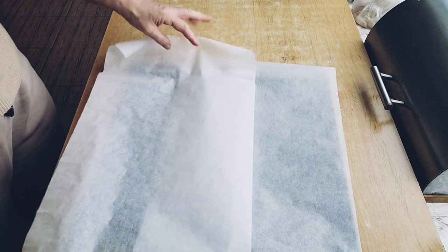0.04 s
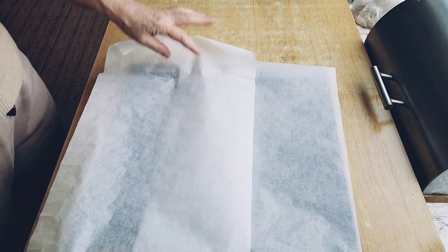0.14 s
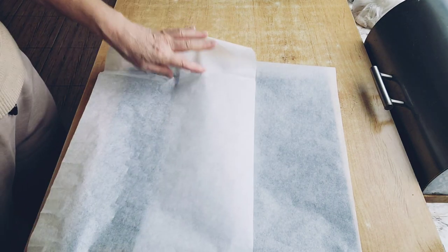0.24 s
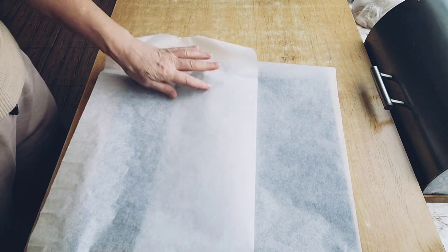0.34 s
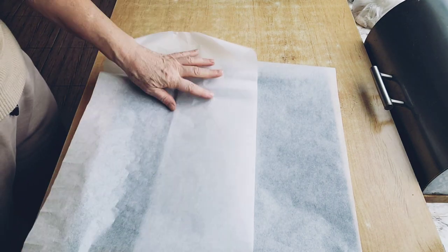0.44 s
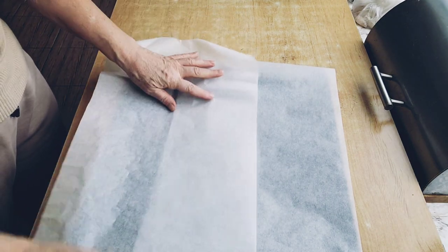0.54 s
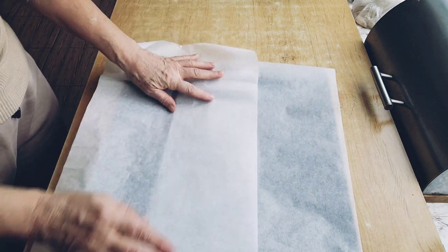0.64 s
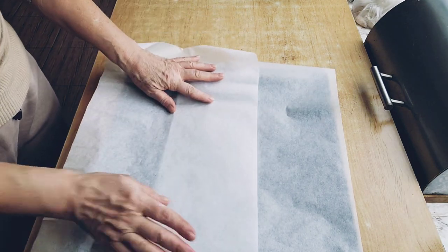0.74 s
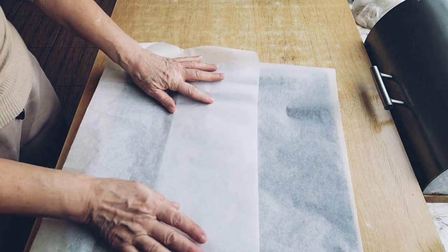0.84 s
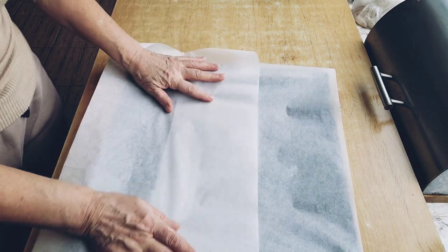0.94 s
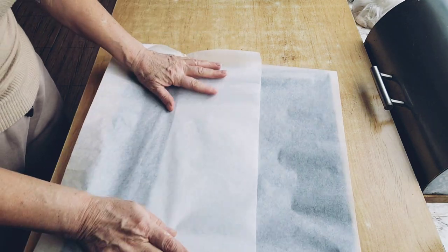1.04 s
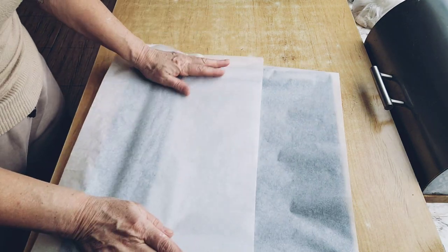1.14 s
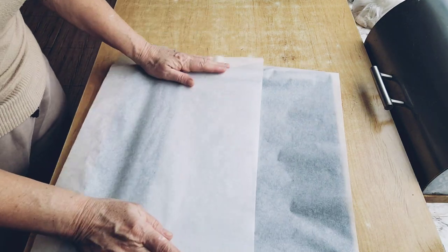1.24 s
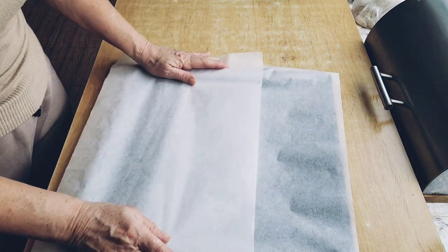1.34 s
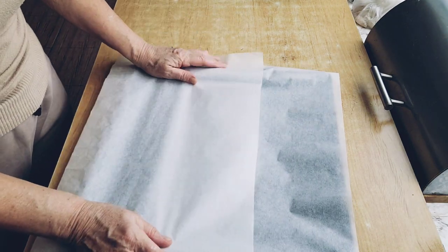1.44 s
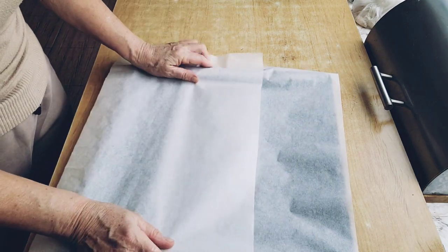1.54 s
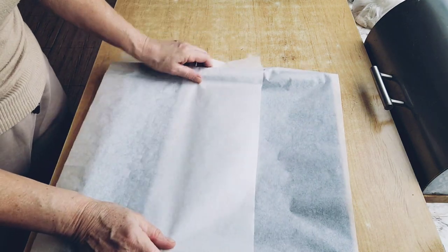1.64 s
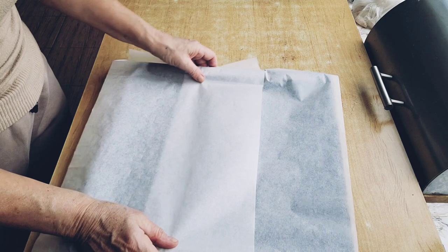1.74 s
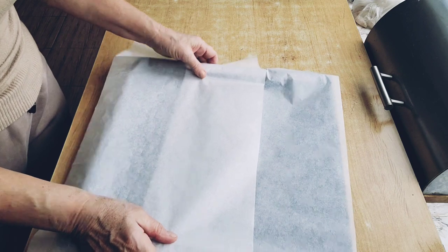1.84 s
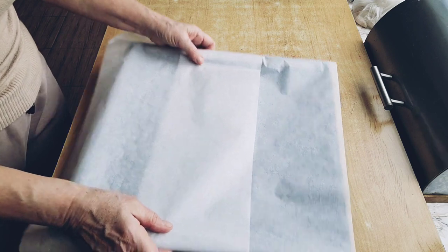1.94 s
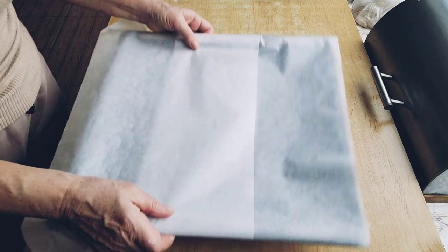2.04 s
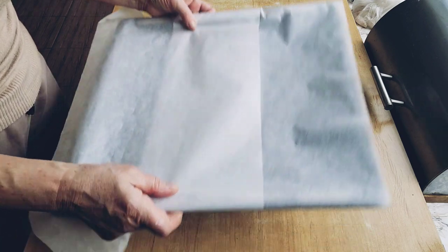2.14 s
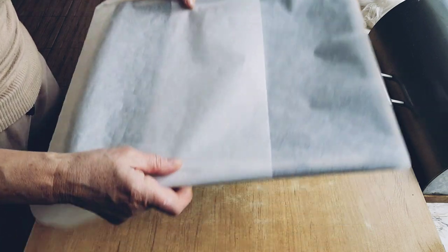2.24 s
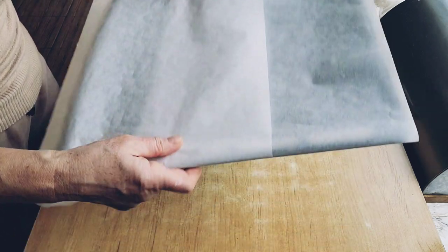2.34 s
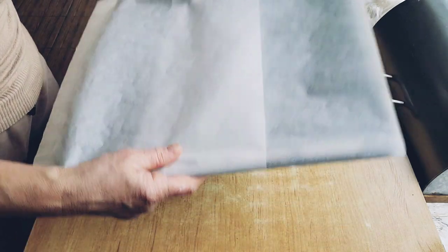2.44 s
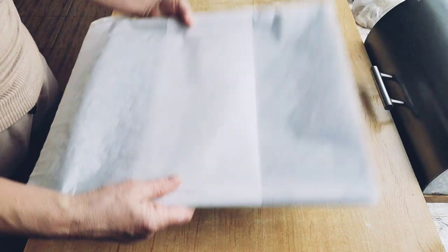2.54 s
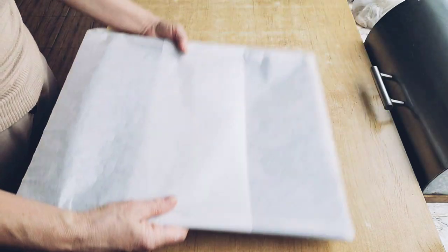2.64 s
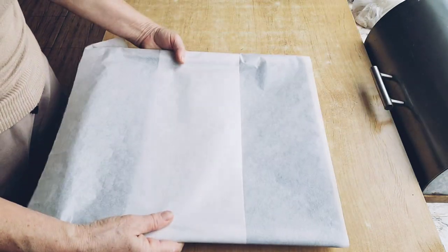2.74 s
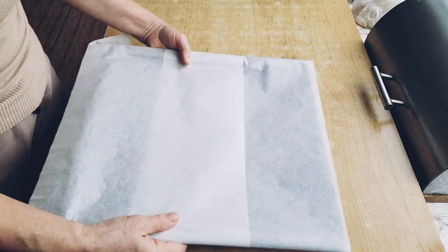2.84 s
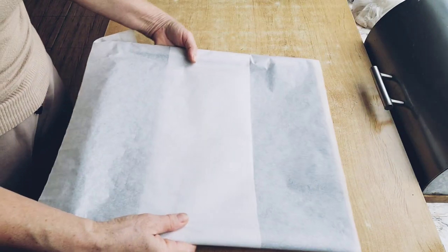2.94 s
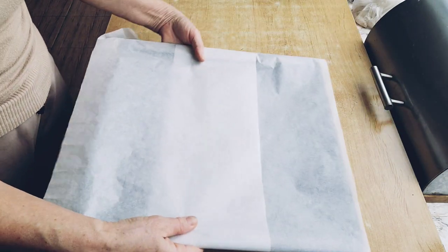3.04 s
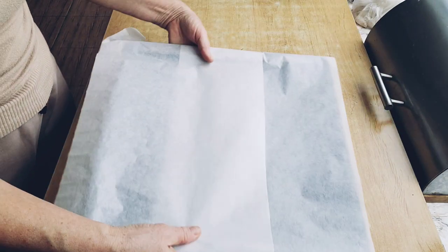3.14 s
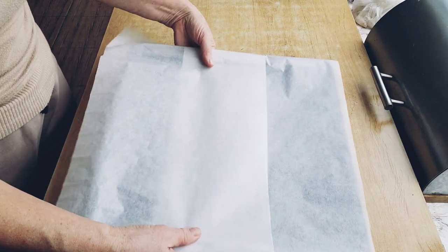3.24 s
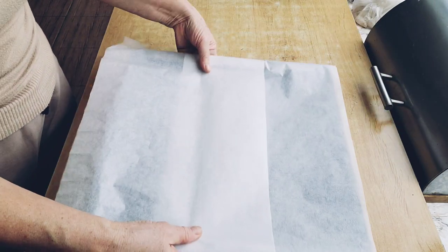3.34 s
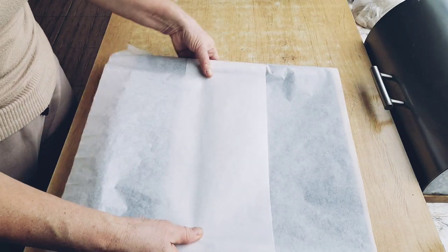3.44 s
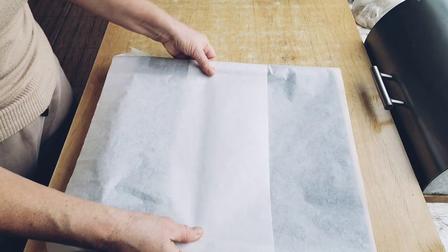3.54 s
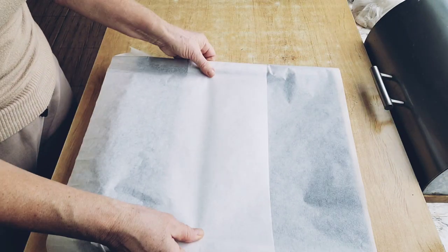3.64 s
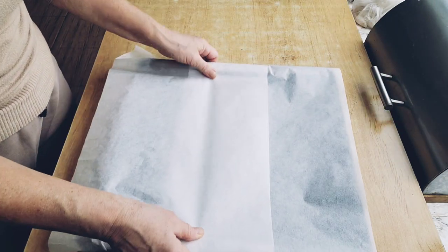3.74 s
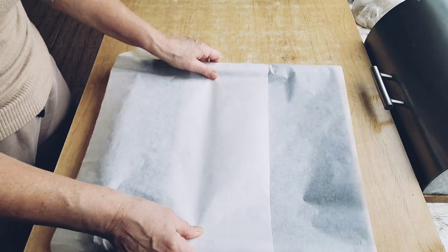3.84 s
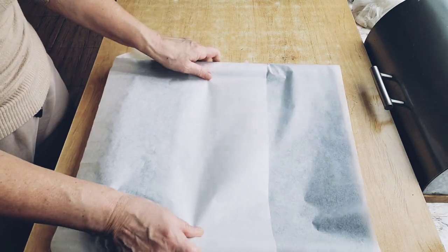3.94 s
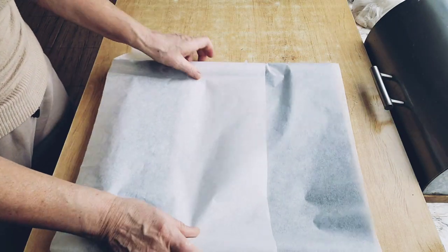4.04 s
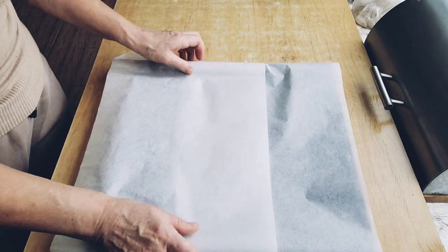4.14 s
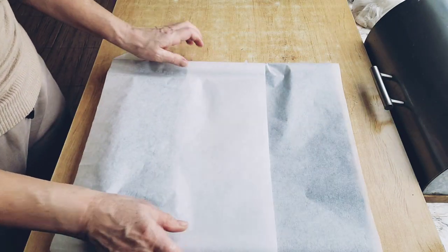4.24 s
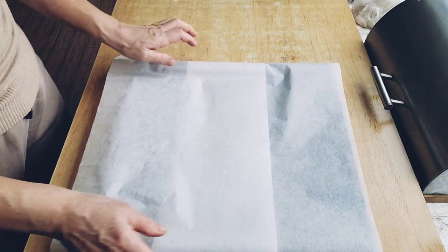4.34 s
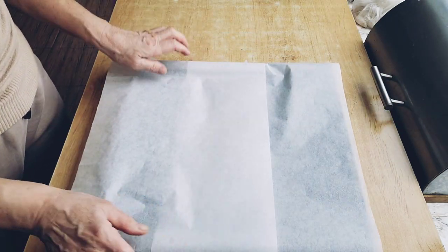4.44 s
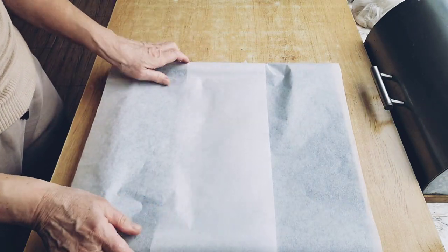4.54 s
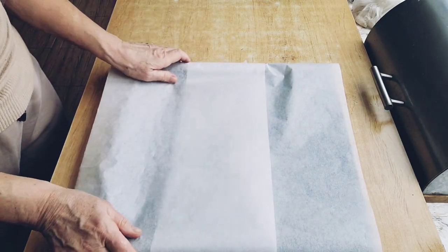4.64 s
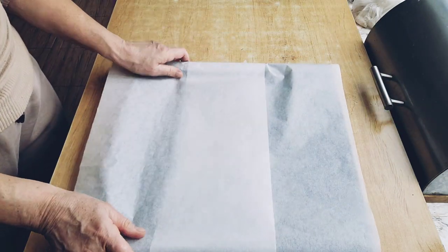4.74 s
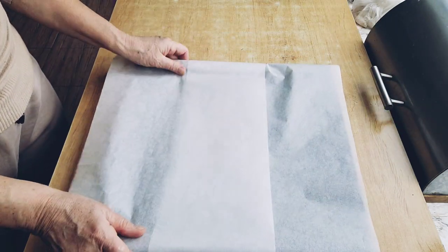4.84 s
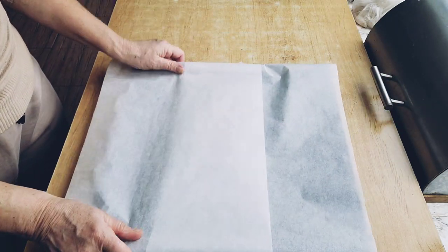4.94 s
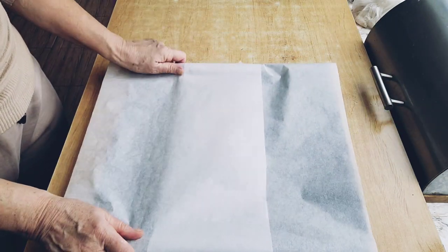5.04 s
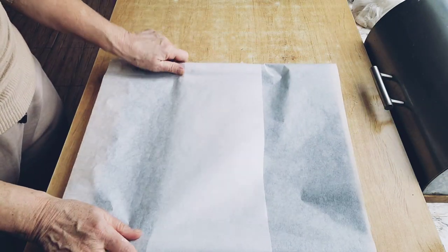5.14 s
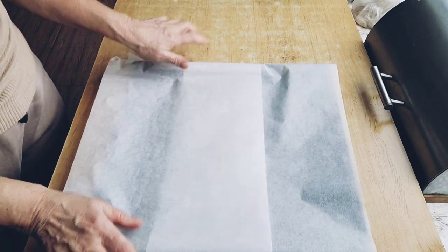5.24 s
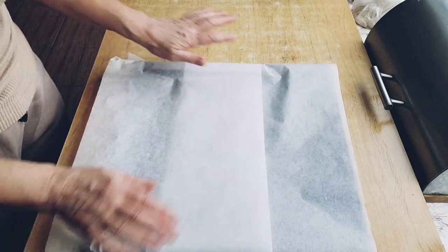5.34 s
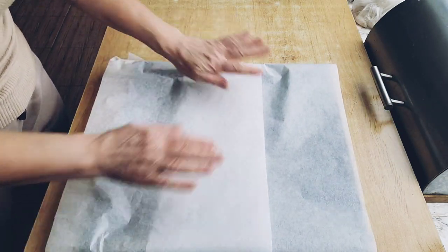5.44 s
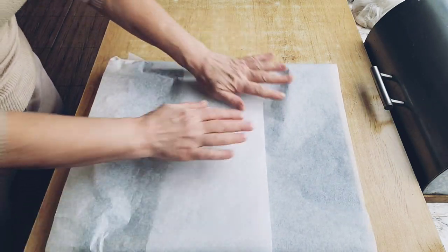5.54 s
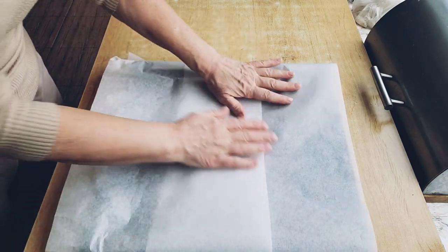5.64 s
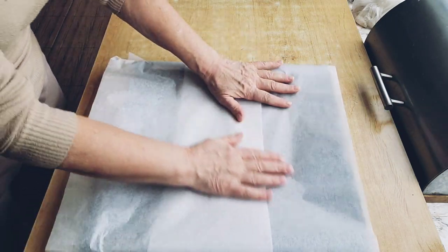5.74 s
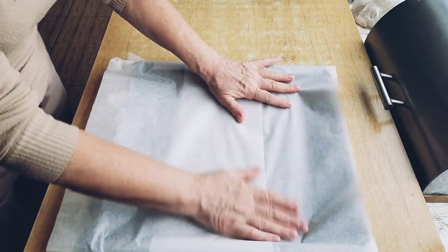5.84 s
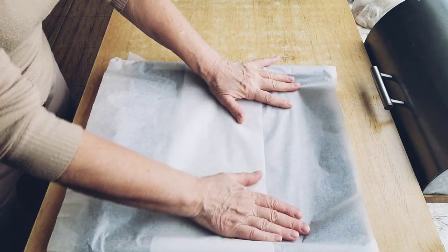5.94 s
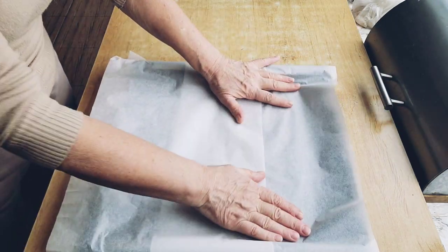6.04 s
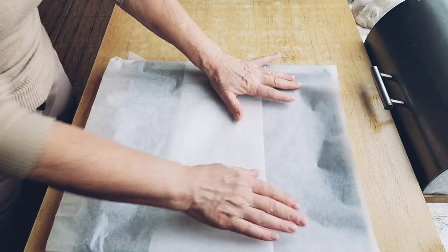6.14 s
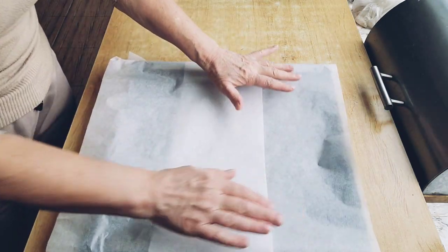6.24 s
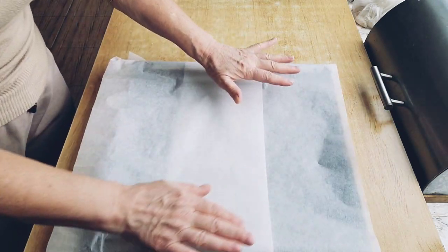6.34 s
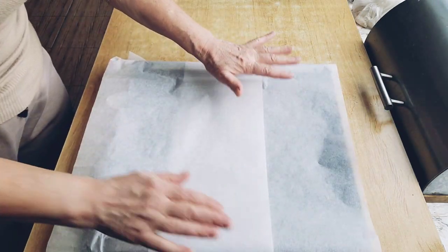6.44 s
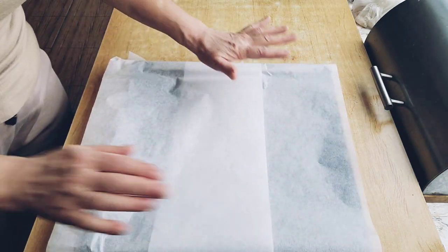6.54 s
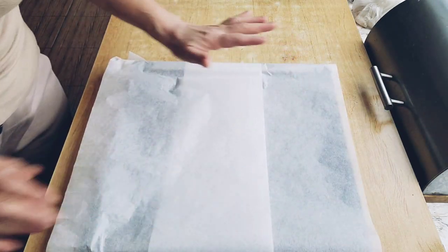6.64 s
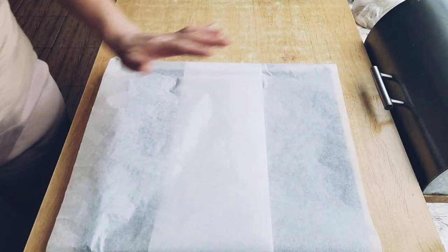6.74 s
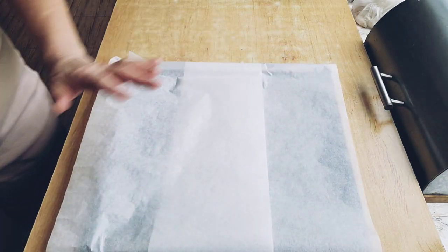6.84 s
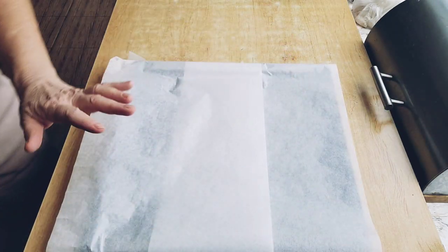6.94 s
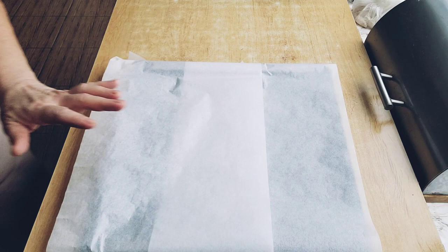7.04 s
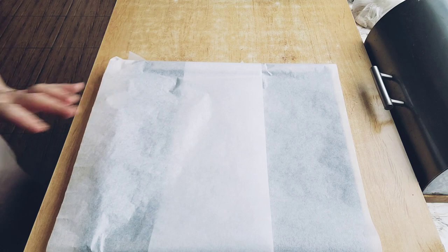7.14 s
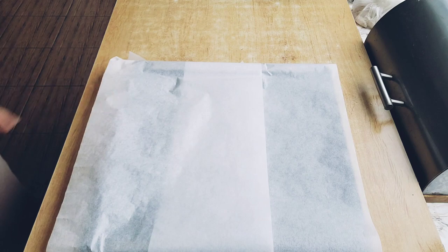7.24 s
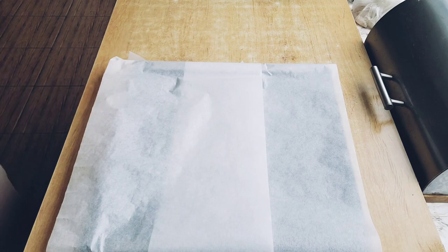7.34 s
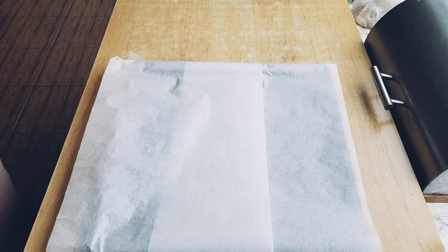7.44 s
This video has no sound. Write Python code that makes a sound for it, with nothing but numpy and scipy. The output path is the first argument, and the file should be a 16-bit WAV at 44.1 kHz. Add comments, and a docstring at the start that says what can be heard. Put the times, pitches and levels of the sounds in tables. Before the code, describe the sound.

Crisp parchment hisses and crinkles as it is stretched over a metal tray, with one sharp double knock midway on a wooden table.

```python
"""Baking parchment is smoothed by hand over a metal tray on a wooden table in a small kitchen.
The paper hisses as it slides and crackles as it buckles (noise and random shivers under hand strokes);
creases snap and the paper slaps at two knocks (short bursts); the loose sheet flexes hollowly (noise bands).
The tray knocks and rings (noise, thud, decaying modes); a sleeve brushes (coloured noise).
Behind it lie quiet air and a faint appliance hum."""
import sys
import numpy as np
from scipy import signal
from scipy.fft import rfft, irfft
from scipy.io import wavfile
from scipy.ndimage import uniform_filter1d

SR = 44100
rng = np.random.default_rng(int(sys.argv[2]) if len(sys.argv) > 2 else 0)


def master_out(mix):
    """Clip the mix to full scale and print it as 16-bit PCM to the path in sys.argv[1]."""
    frames = np.transpose(np.atleast_2d(mix))
    ceiling = np.clip(frames, -1, 1)
    pcm = np.round(ceiling * 32767).astype(np.int16)
    wavfile.write(sys.argv[1], SR, pcm)


N = 330309
TIME = np.arange(N) / SR


def from_db(db):
    """Decibels to amplitude gain."""
    return 10 ** (np.asarray(db) / 20)


def rms_one(x):
    """Scale to unit power."""
    return x / np.sqrt(np.mean(x ** 2) + 1e-20)


def at_hz(points, hz):
    """Read a table along log frequency."""
    known_hz, values = np.transpose(points)
    return np.interp(np.log(np.maximum(hz, 1)), np.log(known_hz), values)


def cut(x, hz, kind, order=2):
    """Butterworth filter."""
    sos = signal.butter(order, np.clip(hz, 10, SR * .45), kind, fs=SR, output="sos")
    return signal.sosfilt(sos, x + 1e-18)


def convolve(x, response):
    """Pass both channels through a response."""
    return signal.oaconvolve(np.atleast_2d(x), np.atleast_2d(response), axes=1)[:, :N]


def colour(x, spectrum, size=4096):
    """Causal (minimum-phase) filter of unit energy with the given spectrum."""
    gain = from_db(at_hz(spectrum, np.fft.rfftfreq(size, 1 / SR)))
    cepstrum = irfft(np.log(gain))
    # fold the cepstrum onto positive time
    causal = 2 * cepstrum[:size // 2] * (np.arange(size // 2) > 0)
    response = irfft(np.exp(rfft(causal, size)))
    return convolve(x, response / np.linalg.norm(response))


def diffuse(size, apart_hz=720):
    """Stereo noise: the two microphones hear the same bass but unrelated treble."""
    mid, side = rng.standard_normal((2, size))
    side = cut(side, apart_hz, "high", order=1)
    return rms_one(np.array([mid + side, mid - side]))


def placed(x, lag_samples, pan_db):
    """A point on the sheet reaches the two microphones at different times and levels."""
    left = x * from_db(pan_db / 2)
    right = np.roll(x, int(lag_samples)) * from_db(-pan_db / 2)
    return np.array([left, right])


def linger(power, t60_s):
    """Spread power into an exponential tail that holds the same energy."""
    r = from_db(-120 / (max(t60_s, .001) * SR))
    return signal.lfilter([1 - r], [1, -r], power + 1e-16)


def kitchen(x, wet_db, t60_s, early_db=-0.5, early_t60_s=0.17, dull_hz=None):
    """Echoes are a fresh scatter of noise under decaying power: quick ones off the table, then the room."""
    power = np.mean(x ** 2, axis=0)
    early, wet = from_db(early_db) ** 2, from_db(wet_db) ** 2
    room = linger(linger(power, .025), t60_s)
    echoes = early * linger(power, early_t60_s) + wet * room
    scatter = diffuse(N)
    if dull_hz:
        scatter = rms_one(cut(scatter, dull_hz, "low"))
    return (x + np.sqrt(echoes) * scatter) / np.sqrt(1 + early + wet)


def drift(knots_per_s):
    """Slow chance: random knots with a spread of 1, joined by straight lines."""
    knots = rng.standard_normal(512)
    return np.interp(TIME * knots_per_s, np.arange(len(knots)), knots)


def swell(crest_s, rise_s, fade_s, db):
    """Power of one movement: it gathers, crests and dies away."""
    shape = 1.68  # 10 dB down one rise before and one fade after the crest; 1 is pointed, 2 is round
    span_s = np.where(TIME < crest_s, max(rise_s, .005), max(fade_s, .005))
    away = np.abs(TIME - crest_s) / span_s
    return from_db(db - 10 * np.minimum(away ** shape, 20)) ** 2


def background():
    """Quiet air is coloured noise; an appliance hums in a few steady sines."""
    # Each row: frequency in Hz, RMS level in dB.
    hum_tones = [(49, -89.5), (102, -81.5), (300, -83.5)]
    # Spectrum of the still air. Each row: frequency in Hz, density in dB per Hz.
    air_spectrum = [(20, -8), (50, 2), (130, -12), (300, -13.5), (600, -14.5), (1500, -20), (5000, -29),
                    (16000, -32)]
    hum = sum(from_db(db) * np.sqrt(2) * np.sin(2 * np.pi * hz * TIME) for hz, db in hum_tones)
    return hum + from_db(-73.0) * colour(diffuse(N), air_spectrum)


def sleeve():
    """Wool on wool: a soft, even hiss as the knitted sleeve brushes the body."""
    # Each row: crest in seconds, rise in seconds, fade in seconds, level in dB.
    brushes = [(6.82, .04, 0.061, -58.5), (7.24, 0.1, 0.11, -63.5), (7.37, 0.071, 0.066, -55)]
    # Spectrum of the wool. Each row: frequency in Hz, density in dB per Hz.
    wool_spectrum = [(300, -40.5), (1500, -18.5), (3000, -4.5), (5000, -3), (9000, -2), (16000, -6)]
    power = sum(swell(*brush) for brush in brushes)
    return colour(diffuse(N) * np.sqrt(power), wool_spectrum)


def tray(clatter_db=-6.5, thud_db=13.5, ring_db=-21.5, clatter_t60_s=0.076, size=30000):
    """Each knock is a thud, a dense clatter of quickly damped plate modes, and the long ring of the clear ones."""
    # Knocks by the table or a palm. Each row: start in seconds, relative level in dB, contact low-pass
    # in Hz, ring left by the damping hand in dB, lowest pitch of thud and clatter in Hz.
    knocks = [(2.696, 1, 3197, 4.5, 55), (2.7057, -2.5, 2800, 4, 62.7), (2.7135, -8.5, 1996, -16, 62.7),
              (2.8664, -1.5, 2700, 6, 60.1), (2.8715, 3, 2435, 2.5, 55), (2.883, -8, 1790, -10.5, 59.5),
              (3.488, -17.5, 756, 2, 60), (4.011, -42, 1400, -17, 498), (5.739, -10.5, 550, -20, 254),
              (6.099, -37, 900, -13, 260)]
    # Clear modes of the tray on the table. Each row: frequency in Hz, relative level in dB, t60 in seconds.
    tray_modes = [(111, -10, .34), (289, -8, .27), (425, -14, .22), (477, -12, .25), (633, 1, .27),
                  (719, -11, .3), (813, -7, .27), (904, -15, .33), (1304, -9, .25), (1400, -7, .28),
                  (1427, -7.5, .62), (1640, -13, .26), (1950, -11, .27), (2270, -12, .28)]
    # Spectrum of thud and clatter. Each row: frequency in Hz, density in dB per Hz.
    clatter_spectrum = [(20, -45), (60, -24), (110, -10.5), (190, -11.5), (290, -5.5), (550, 0.5),
                        (950, -5.5), (1400, -3.5), (2200, -4), (3200, -9), (5000, -11.5), (9000, -15),
                        (16000, -18)]
    clatter, rings = np.zeros((2, N + size)), np.zeros((2, N + size))
    t = TIME[:size]
    hz, mode_db, t60_s = np.transpose(tray_modes)[:, :, None]
    modes = from_db(mode_db - 60 * t / t60_s) * np.sin(2 * np.pi * hz * t)
    for s, db, bright_hz, damped_db, lowest_hz in knocks:
        at = round(s * SR)
        burst = from_db(clatter_db) * diffuse(size) * from_db(-60 * t / clatter_t60_s)
        burst[:, 0] -= from_db(thud_db)
        blow = cut(cut(burst, bright_hz, "low"), lowest_hz, "high")
        # where the knock lands sets the sign and strength of every mode
        signs = rng.choice([-1, 1], len(hz))
        strengths = signs * from_db(ring_db + damped_db + rng.normal(0, 1.2, (2, len(hz))))
        clatter[:, at:at + size] += from_db(db) * blow
        rings[:, at:at + size] += from_db(db) * cut(strengths @ modes, bright_hz, "low")
    # the echoes are dull like the knocks
    heard = kitchen(clatter[:, :N], wet_db=-0.5, t60_s=.33, early_db=-11.0, dull_hz=2800)
    # the high-pass keeps the start of the ringing free of low thump
    return colour(heard, clatter_spectrum) + cut(rings[:, :N], 70, "high")


def flexing(papery_power, flutter_db=3.0, count=9):
    """The wide sheet flutters over the air beneath it; bending and pulling it taut moves its hollow resonance."""
    # The sheet bows where it hangs free. Each row: crest in seconds, rise in seconds, fade in seconds,
    # level in dB, centre of the hollow in Hz, width in octaves.
    bows = [(0.12, 0.24, 0.11, -51, 300, 0.23), (1.0, 0.16, .12, -41.5, 340, 0.9),
            (2.07, 0.19, .22, -35, 520, 0.56), (2.37, 0.13, 0.19, -41, 476, 0.53),
            (3.24, 0.13, 0.21, -44.5, 560, 0.55), (3.76, 0.066, 0.029, -51, 364, 0.23)]
    # A palm bears down and drags the sheet over the tray. Each row: crest in seconds, rise in seconds,
    # fade in seconds, rumble level in dB.
    presses = [(0.89, 0.059, 0.15, -47.5), (3.52, 0.056, .05, -59.5), (5.78, .07, 0.16, -55.5)]
    # Spectrum of the drag. Each row: frequency in Hz, density in dB per Hz.
    rumble_spectrum = [(20, -21.5), (50, -9.5), (85, -4.5), (112, 4.5), (150, -3), (210, -2.5),
                       (400, -19.5), (1200, -49)]
    # sheet lying on the tray: hollow against papery strokes; drag against the hollow
    hollow_db, hollow_hz, hollow_octaves, rumble_db = -12, 470, 0.68, -19.5

    parts = np.array([papery_power * from_db(hollow_db) ** 2] + [swell(*bow[:4]) for bow in bows])
    power = parts.sum(axis=0)
    shapes = np.array([(hollow_hz, hollow_octaves)] + [bow[4:] for bow in bows])
    centre_hz, width_octaves = shapes.T @ parts / power
    drag_power = power * from_db(rumble_db) ** 2 + sum(swell(*press) for press in presses)
    flutter_noise = rms_one(cut(rng.standard_normal(N), 43, "low"))
    flutter = rms_one(from_db(flutter_db * flutter_noise))

    bands_hz = np.geomspace(200, 900, count)
    octaves_off = np.log2(bands_hz[:, None] / centre_hz)
    weights = np.exp(-.5 * (octaves_off / width_octaves) ** 2)
    weights = weights / np.linalg.norm(weights, axis=0)
    noises = diffuse(N), diffuse(N)  # neighbouring bands take different noise
    hollow = 0
    for k, hz in enumerate(bands_hz):
        hollow = hollow + weights[k] * rms_one(cut(noises[k % 2], [hz / 1.1, hz * 1.1], "band"))
    drag = colour(diffuse(N) * np.sqrt(drag_power), rumble_spectrum)
    return flutter * (hollow * np.sqrt(power) + drag)


def handling():
    """All strokes together: crisp power, papery power and the share of buckling at every moment."""
    # Pushes and sweeps of the hands. Each row: crest in seconds, rise in seconds, fade in seconds,
    # crisp treble in dB, papery middle in dB over the treble, share of buckling against sliding (0-1).
    strokes = [(0.06, 0.6, 0.2, -42, -5.5, 0.87), (0.34, 0.036, .03, -41.5, -1.5, .7),
               (0.425, 0.048, 0.11, -33, -5.5, 0.78), (0.62, 0.12, 0.1, -36.5, -4.5, 0.8),
               (0.725, 0.059, 0.035, -32.5, -7, 0.6), (0.838, 0.046, 0.033, -29.5, -6.5, 0.47),
               (0.989, 0.1, 0.075, -24.5, -5, 0.46), (1.18, 0.14, 0.057, -25.5, -6, 0.6),
               (1.32, 0.1, .17, -30, -4.5, 0.47), (1.605, 0.057, 0.15, -26, -5.5, 0.64),
               (1.71, 0.067, 0.094, -27.5, -3.5, 0.66), (2.048, 0.19, 0.1, -24, -6.5, 0.42),
               (2.26, 0.3, 0.29, -32, -8, 0.7), (2.66, 0.12, 0.32, -49, 1.5, 1),
               (3.15, 0.16, 0.22, -38.5, -2.5, 0.63), (3.365, 0.062, .045, -35, -7, .75),
               (3.538, 0.067, 0.056, -34, -4, 0.8), (3.73, 0.11, 0.056, -40.5, -4, 0.95),
               (3.818, 0.048, 0.04, -30.5, 0, 0.94), (4.0, 0.24, 0.14, -37, -4.5, .55),
               (4.159, 0.082, 0.076, -41.5, -5, 0.7), (4.535, .01, 0.12, -35.5, -9.5, 0.6),
               (4.615, 0.049, 0.075, -24, -11, 0.32), (4.699, 0.061, 0.17, -31, -3.5, 0.5),
               (4.91, 0.061, 0.18, -29.5, -6, 0.54), (5.22, 0.22, 0.1, -37, -6.5, 0.9),
               (5.721, .08, 0.12, -25, -5.5, 0.74), (5.87, 0.06, 0.054, -26.5, -5.5, 0.4),
               (6.04, 0.3, 0.071, -39, -5, 0.84), (6.166, 0.075, 0.086, -29, -7.5, 0.7),
               (6.404, 0.04, 0.048, -52.5, 1.5, .8), (6.58, 0.087, 0.23, -62, -3, 0.65)]
    crisp = papery = buckled = 1e-14
    for *timing, db, papery_db, share in strokes:
        power = swell(*timing, db)
        crisp = crisp + power
        papery = papery + power * from_db(papery_db) ** 2
        buckled = buckled + power * share
    return crisp, papery, np.clip(buckled / crisp, 0, 1)


def crackle(median_per_s, spread_db, clump_db, shiver_t60_s, count=4):
    """Tiny buckles come in clumps from several patches of the sheet, each with its own place and colour."""
    clumps = rms_one(uniform_filter1d(rng.standard_normal(N), 400))
    born = rng.random(N) < median_per_s * from_db(clump_db * clumps) / SR
    sizes = born * from_db(spread_db * np.minimum(rng.exponential(1, N), 3))
    patch = rng.integers(0, count, N)
    lags = rng.permutation(np.linspace(-5, 6, count))
    out = 0
    for k, hz in enumerate(np.geomspace(1500, 13000, count)):
        # each buckle sets the sheet shivering for a few milliseconds
        shiver_power = linger(sizes ** 2 * (patch == k), shiver_t60_s)
        own = np.sqrt(shiver_power) * rng.standard_normal(N)
        tinted = own + 4.1 * cut(own, [hz, hz * 1.45], "band", order=1)
        out = out + placed(tinted, lags[k], rng.normal(0, 1.5))
    # level out the power over 2600 samples
    power = uniform_filter1d(np.mean(out ** 2, axis=0), 2600)
    return out / np.sqrt(np.maximum(power, 0) + 1e-9)


def snaps(starts_s, levels_db, run_s, tick, tick_s=.0008, rise_s=.0009, size=1800):
    """Each snap or slap is a short dying run of small buckles and, if tick > 0, a thin bright tick."""
    out, t = np.zeros((2, N + size)), TIME[:size]
    for s, db in zip(starts_s, levels_db):
        noise = rng.standard_normal(size) * from_db(2.6 * rng.standard_normal(size))
        run = noise * (1 - np.exp(-t / rise_s)) * np.exp(-t / run_s)
        crack = cut(noise, 8500, "high") * (t / tick_s) * np.exp(1 - t / tick_s)
        snap = rms_one(run + tick * crack)
        at = round(s * SR)
        out[:, at:at + size] += from_db(db) * placed(snap, rng.integers(-3, 6), rng.normal(0, 1.5))
    return out[:, :N]


def shifting(x, count=7):
    """Facets of changing size take their turn: drifting band gains keep the rustle's colour shifting."""
    shift_db, shifts_per_s = 1.3, 16
    for hz in np.geomspace(1100, 13000, count):
        gain = from_db(shift_db * drift(shifts_per_s))
        x = x + (gain - 1) * cut(x, [hz / 1.2, hz * 1.2], "band", order=1)
    return x


def paper(crisp_power, papery_power, share):
    """Buckling, sliding and snapping excite the sheet; small facets sound crisp, wider ones papery."""
    # Creases that snap, and the paper slapping at the two tray knocks (2.70 and 2.87 s).
    # Each row: start in seconds, crisp treble in dB, papery middle in dB.
    snap_rows = [(0.0633, -44, -62), (0.1048, -48, -61), (0.307, -52, -45.5), (0.342, -37, -46),
                 (0.412, -29.5, -51), (0.5856, -35, -60), (0.6634, -39, -51), (0.7344, -39.5, -58),
                 (0.7892, -42, -43.5), (0.9253, -32, -40), (0.9783, -27, -38), (1.1046, -42, -47),
                 (1.2867, -33, -37), (1.6698, -25, -41), (2.1909, -29, -34.5), (2.262, -31.5, -39),
                 (2.6985, -33.5, -42), (2.873, -33, -33.5), (3.0118, -33, -40), (3.377, -36, -47),
                 (3.6628, -44.5, -53), (3.865, -33.5, -43.5), (3.922, -36.5, -46.5), (4.0122, -37.5, -37),
                 (4.2995, -51.5, -56.5), (4.327, -45, -53), (4.3994, -59.5, -60), (4.4732, -59, -63),
                 (4.5233, -35, -52.5), (4.567, -29, -41.5), (4.616, -27, -53), (4.6957, -26, -46),
                 (4.789, -35, -35), (4.8388, -37.5, -46), (5.038, -35, -66), (5.1808, -35.5, -43),
                 (5.2485, -37.5, -48), (5.388, -48.5, -59.5), (5.457, -35.5, -52.5), (5.464, -34.5, -47),
                 (5.5932, -42.5, -55.5), (5.7734, -33, -41), (6.101, -46, -39.5), (6.198, -48, -43.5),
                 (6.3913, -48.5, -52.5), (6.4805, -61, -57.5), (6.551, -53, -57.5), (6.577, -51.5, -70),
                 (6.7301, -66, -88), (6.9284, -75.5, -71.5)]
    # Spectra of small and wide facets. Each row: frequency in Hz, density in dB per Hz.
    crisp_spectrum = [(300, -55), (1200, -15), (2200, 0), (3000, .5), (4800, 2), (6300, -2.5), (8200, -1),
                      (10500, -2.5), (13000, -1.5), (16000, -4)]
    papery_spectrum = [(100, -45), (300, -12.5), (600, -5.5), (950, -0.5), (1500, 0.5), (2100, -2),
                       (3000, -3), (6000, -37.5)]
    jerk_db, jerks_per_s = 1.57, 12  # the hands move unevenly
    starts_s, snap_crisp_db, snap_papery_db = np.transpose(snap_rows)
    buckling, sliding = np.sqrt(share), np.sqrt(1 - share)
    jerks = rms_one(from_db(jerk_db * drift(jerks_per_s)))

    small = buckling * crackle(median_per_s=450, spread_db=6.0, clump_db=4.8, shiver_t60_s=.007)
    small = small + sliding * diffuse(N)
    wide = buckling * crackle(median_per_s=380, spread_db=5.0, clump_db=4.0, shiver_t60_s=.018)
    wide = wide + sliding * diffuse(N)

    small = small * jerks * np.sqrt(crisp_power) + snaps(starts_s, snap_crisp_db, run_s=.0025, tick=.7)
    wide = wide * jerks * np.sqrt(papery_power) + snaps(starts_s, snap_papery_db, run_s=.0063, tick=0)

    small_heard = kitchen(small, wet_db=-4.0, t60_s=.2, early_db=-1.0, early_t60_s=.05)
    wide_heard = kitchen(wide, wet_db=-0.5, t60_s=.2, early_db=-4.0, early_t60_s=.06)
    return shifting(colour(small_heard, crisp_spectrum) + colour(wide_heard, papery_spectrum))


def scene():
    """The strokes drive both the rustle and the flexing; the rustle lies a little to the left."""
    left_db = 1.0
    crisp_power, papery_power, share = handling()
    rustle = paper(crisp_power, papery_power, share) * from_db([[left_db], [-left_db]])
    return rustle + flexing(papery_power) + tray() + sleeve() + background()


def record(dry):
    """The loudest peaks are rounded and the top is cut."""
    cutoff_hz = 16100
    rounded = 1.2 * np.tanh(dry / 1.2)
    return signal.sosfilt(signal.ellip(12, .1, 80, cutoff_hz, fs=SR, output="sos"), rounded)


dry = scene()
out = record(dry)
master_out(out)
```